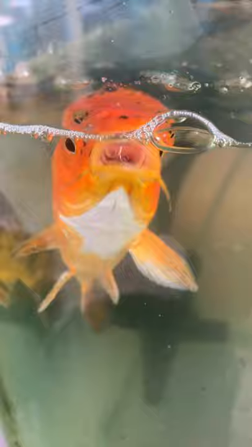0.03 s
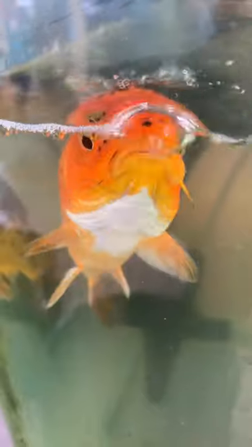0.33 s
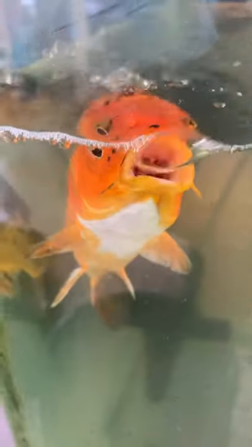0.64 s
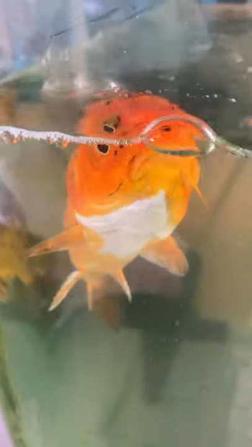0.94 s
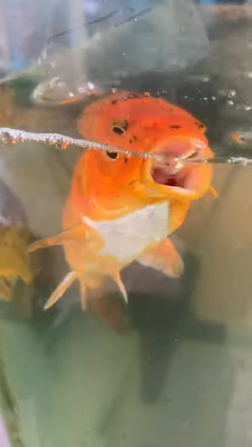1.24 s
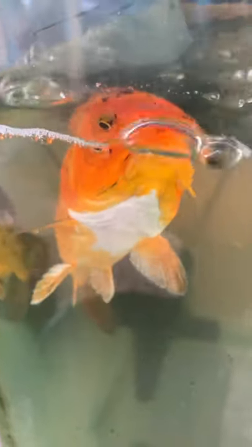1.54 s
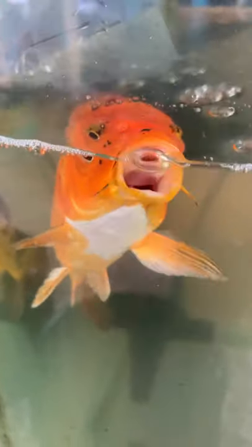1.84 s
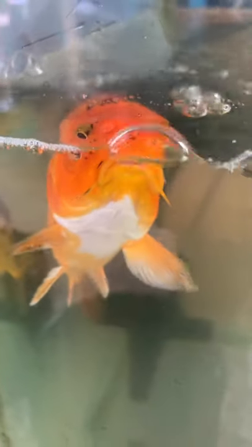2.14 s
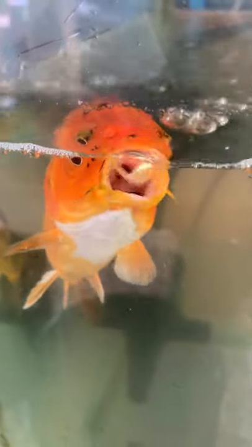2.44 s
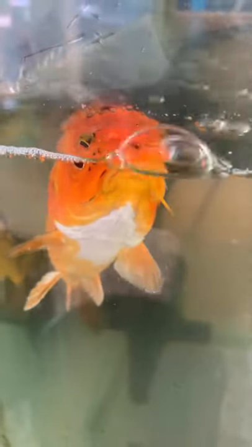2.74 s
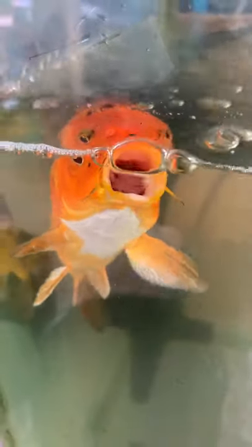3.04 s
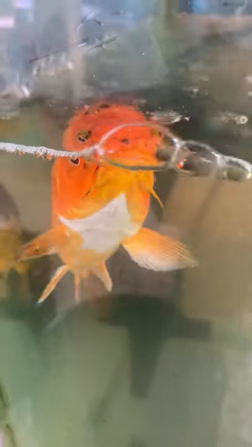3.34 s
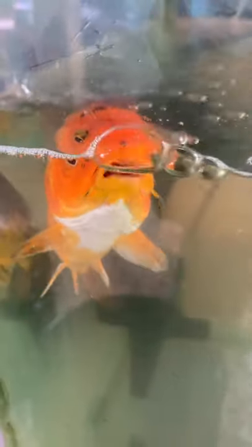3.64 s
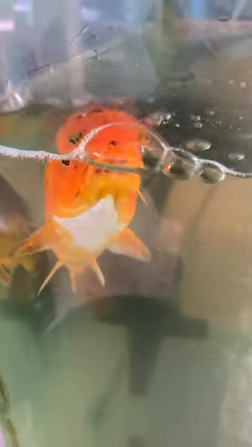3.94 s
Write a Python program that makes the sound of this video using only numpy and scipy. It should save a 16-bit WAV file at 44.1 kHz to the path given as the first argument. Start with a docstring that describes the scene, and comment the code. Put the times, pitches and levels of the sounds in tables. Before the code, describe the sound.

A goldfish gulps at the surface of a tank, very close, making short bubbles and sharp wet pops. A small cluster in the first half second thins to light ticks. From about 1.3 seconds the water gurgles and fizzes in surges, strongest near 1.8, 2.6 and 3.2 seconds. After 3.4 seconds it settles to a few small bubbles. A low uneven rumble and faint hiss lie underneath.

```python
"""At the surface of a fish tank, very close, a goldfish gulps.
Its lips trap air that rings as short bubbles, films burst with sharp ticks, and the churned
water gurgles and fizzes in surges. Under it lie a lumpy low rumble, a faint hum and hiss.
The tank adds a resonance and a short ring from its glass walls."""
import sys
import numpy as np
from scipy import signal
from scipy.fft import rfft, irfft
from scipy.io import wavfile

SR = 44100
rng = np.random.default_rng(int(sys.argv[2]) if len(sys.argv) > 2 else 0)


def materialize(psi):
    """Save the field psi as 16-bit PCM at rate SR to the path in sys.argv[1].

    A 1-D psi becomes a single channel; in a 2-D psi each row is a channel.
    """
    bounded = np.clip(np.atleast_2d(psi).T, -1, 1)
    quanta = np.round(bounded * 32767).astype(np.int16)
    wavfile.write(sys.argv[1], SR, quanta)


N = 176400
TIME = np.arange(N) / SR


def from_db(db):
    """Decibels to gain."""
    return 10 ** (np.asarray(db) / 20)


def unit_rms(x):
    """Scale to rms 1."""
    return x / np.sqrt(np.mean(x ** 2) + 1e-20)


def gain_curve(rows):
    """Gain over time from (s, dB) rows."""
    return from_db(np.interp(TIME, *np.transpose(rows)))


def decay(t, t60_s):
    """Fall by 60 dB in t60_s."""
    return from_db(-60 * t / t60_s)


def add(out, start_s, sound):
    """Mix a sound in at start_s."""
    i = int(np.clip(start_s * SR, 0, N - 1))
    out[i:i + len(sound)] += sound[:N - i]


def coloured(x, spectrum):
    """Filter by (Hz, dB) rows, rolling off outside them; rms 1."""
    hz = np.arange(N // 2 + 1) * SR / N
    row_hz, row_db = np.transpose(spectrum)
    gain = from_db(np.interp(np.log(hz + 1e-3), np.log(row_hz), row_db))
    skirts = 1 / (1 + (hz / (2 * row_hz[-1])) ** 4) / (1 + (row_hz[0] / (2 * hz + 1e-3)) ** 4)
    return unit_rms(irfft(rfft(x) * gain * skirts, N))


def noise(spectrum):
    """Coloured noise, rms 1."""
    return coloured(rng.standard_normal(N), spectrum)


def resonance(x, hz, width_hz):
    """Two-pole resonator, peak gain 1."""
    r = np.exp(-np.pi * width_hz / SR)
    feedback = [1, -2 * r * np.cos(2 * np.pi * hz / SR), r * r]
    return signal.lfilter(np.array([1, 0, -1]) * (1 - r * r) / 2, feedback, x + 1e-18)


def band(x, hz, width_hz, widen=1):
    """Two resonators in series, the second widen times as wide; rms 1."""
    return unit_rms(resonance(resonance(x, hz, width_hz), hz, widen * width_hz))


def clumps(spread_db=2.33, cutoff_hz=69):
    """Wandering gain: foam and churning come in quick uneven clumps."""
    wander = signal.sosfilt(signal.butter(2, cutoff_hz, fs=SR, output="sos"), rng.standard_normal(N))
    return from_db(spread_db * np.clip(unit_rms(wander), -2, 2))


def bubble(hz, t60_cycles, onset_cycles=0.95, rise_per_cycle=0.0019):
    """An air pocket swells in about a cycle, rings down and rises a little in pitch."""
    cycles = np.arange(int(t60_cycles / hz * SR * 1.2) + 2) * hz / SR
    envelope = (1 - np.exp(-(cycles / onset_cycles) ** 2)) * from_db(-60 * cycles / t60_cycles)
    return envelope * np.sin(2 * np.pi * cycles * (1 + rise_per_cycle * cycles / 2))


# Stereo noise spectrum. Each row: frequency in Hz, relative level in dB.
STEREO_NOISE_SPECTRUM = [(25, 13), (100, -4), (200, -2), (500, -3.5), (1500, -17), (4000, -29)]

def faint_stereo_noise():
    """Very faint low diffuse noise that gives slight stereo width."""
    return from_db(-68.5) * noise(STEREO_NOISE_SPECTRUM)


# Hiss spectrum. Each row: frequency in Hz, relative level in dB.
HISS_SPECTRUM = [(100, 9.5), (250, 8.5), (600, 5.5), (1500, -37), (4000, -32), (8500, -6.5),
                 (11000, -11), (16000, -6.5)]

def hum_and_hiss():
    """A faint wavering hum in steady noise, low murmur plus high hiss."""
    hum = from_db(-59) * band(rng.standard_normal(N), hz=391.5, width_hz=27)
    return hum + from_db(-55) * noise(HISS_SPECTRUM)


# Rumble envelope. Each row: time in seconds, level in dB.
RUMBLE_LEVEL = [(0.04, -34.5), (0.31, -41), (0.52, -26.5), (0.87, -31.5), (0.98, -23), (1.16, -28),
                (1.76, -36), (1.79, -23), (2.02, -23.5), (2.14, -33), (2.23, -32), (2.36, -22), (2.44, -24),
                (2.49, -30), (2.94, -34), (3.17, -25.5), (3.43, -37), (3.99, -33.5)]
# Rumble spectrum. Each row: frequency in Hz, relative level in dB.
RUMBLE_SPECTRUM = [(10, 4), (18, -3), (30, -11), (50, -13.5), (80, -23), (130, -29), (220, -38), (400, -45),
                   (900, -54)]

def rumble(bump_s=2.43, bump_hz=21.7, bump_width_s=0.014):
    """Lumpy low noise with one dull bump."""
    t = TIME - bump_s
    bump = from_db(-8.5) * np.exp(-(t / bump_width_s) ** 2) * np.cos(2 * np.pi * bump_hz * t)
    return from_db(4.5) * gain_curve(RUMBLE_LEVEL) * noise(RUMBLE_SPECTRUM) + bump


def tank_echoes(x, cutoff_hz, t60_s=0.076, delay_s=0.002):
    """Dense, dull reflections between the glass walls."""
    t = TIME[:SR // 4]
    echoes = rng.standard_normal(len(t)) * decay(t, t60_s) * (t > delay_s)
    lowpass = signal.butter(1, cutoff_hz, fs=SR, output="sos")
    return signal.fftconvolve(x, signal.sosfilt(lowpass, echoes / np.linalg.norm(echoes)))[:N]


# Vigour of the foam. Each row: time in seconds, level in dB.
FOAM_LEVEL = [(0.04, -46.5), (0.15, -43.5), (0.24, -42), (0.28, -50), (0.35, -44), (0.4, -49.5),
              (0.43, -39), (0.46, -49.5), (0.82, -53.5), (0.84, -48), (0.96, -50), (1.02, -51.5),
              (1.19, -54.5), (1.45, -34.5), (1.5, -42.5), (1.54, -31), (1.75, -38), (1.77, -23),
              (1.94, -44), (1.96, -36.5), (2.04, -47.5), (2.08, -39.5), (2.18, -39), (2.25, -33),
              (2.45, -32.5), (2.49, -27.5), (2.6, -27), (2.64, -35), (2.89, -40), (3.02, -29), (3.06, -35),
              (3.21, -27.5), (3.41, -48), (3.71, -38.0), (3.89, -39), (3.99, -52)]
# Foam spectrum. Each row: frequency in Hz, relative level in dB.
FOAM_SPECTRUM = [(300, 2), (600, -13.5), (1500, -11.5), (3000, -1), (5000, 1), (7000, -2), (8800, 0.5),
                 (10500, -7), (14000, -4), (16000, -16)]

def fizz(collapses_per_s=4000, spread_db=2.5, q=9):
    """Foam: a crowd of tiny collapses on a smooth spray of finer ones."""
    sizes = from_db(spread_db * np.minimum(rng.exponential(1, N), 4)) * rng.choice([-1, 1], N)
    clicks = sizes * (rng.random(N) < collapses_per_s / SR)
    bands_hz = np.geomspace(1800, 14500, 20)
    click_band = rng.integers(0, len(bands_hz), N)
    grains = sum(resonance(clicks * (click_band == k), hz, hz / q) for k, hz in enumerate(bands_hz))
    foam = from_db(-3.5) * coloured(grains, FOAM_SPECTRUM) + from_db(-2.5) * noise(FOAM_SPECTRUM)
    return gain_curve(FOAM_LEVEL) * clumps() * foam


def pings(per_s=110, spread_db=6.5, low_hz=2000, high_hz=9000):
    """Tiny bubbles ping on the surface, louder when the foam is lively."""
    out = np.zeros(N)
    for when, pitch, size in rng.random((int(per_s * N / SR), 3)):
        hz = low_hz * (high_hz / low_hz) ** pitch
        db = -40.5 + spread_db * min(-np.log(1 - size), 3)
        add(out, when * N / SR, from_db(db) * bubble(hz, t60_cycles=34))
    vigour = gain_curve(FOAM_LEVEL)
    return out * vigour / np.median(vigour)


# Vigour of the churning. Each row: time in seconds, level in dB.
GURGLE_LEVEL = [(0.04, -43.5), (0.13, -37.5), (0.31, -49), (0.35, -38.5), (0.38, -49), (0.48, -46),
                (0.61, -50), (0.8, -54.1), (0.86, -49), (1.22, -56.5), (1.24, -43), (1.38, -31.5),
                (1.6, -31.5), (1.74, -35.5), (1.83, -26.3), (1.93, -40), (1.98, -31.3), (2.03, -39),
                (2.23, -30.5), (2.45, -34.3), (2.6, -28), (2.64, -35.5), (2.85, -33), (2.95, -40),
                (3.03, -32.5), (3.13, -33), (3.22, -27.5), (3.32, -35.5), (3.36, -41), (3.42, -50),
                (3.48, -43.5), (3.63, -49), (3.65, -45), (3.99, -48)]
# Churned water spectrum. Each row: frequency in Hz, relative level in dB.
GURGLE_SPECTRUM = [(120, -24), (280, -10.5), (500, -0.5), (800, 3.5), (1100, 0), (1600, 2.5), (2400, -3.5),
                   (3500, -9.5), (6000, -26)]

def gurgle(bubbles_per_s=1000, spread_db=4, low_hz=330, high_hz=4500):
    """A random swarm of lesser bubbles over the wash of churned water."""
    swarm = np.zeros(N)
    wash = from_db(-5) * noise(GURGLE_SPECTRUM) * clumps()
    for when, pitch, size, polarity in rng.random((int(bubbles_per_s * N / SR), 4)):
        hz = low_hz * (high_hz / low_hz) ** np.sqrt(pitch)
        db = spread_db * min(-np.log(1 - size), 3)
        gain = np.sign(polarity - 0.5) * from_db(db) * hz ** 1.1
        add(swarm, when * N / SR, gain * bubble(hz, t60_cycles=20))
    return gain_curve(GURGLE_LEVEL) * (from_db(-4) * coloured(swarm, GURGLE_SPECTRUM) + wash)


# Rising bubbles. Each row: start in seconds, length in seconds, first and last pitch in Hz, level in dB.
RISING_BUBBLES = [(0.038, 0.019, 905, 1450, -37), (1.233, 0.036, 1015, 1470, -37.5),
                  (3.642, 0.053, 850, 1060, -30.5)]

def rising_bubbles(fade_db=14):
    """Long-ringing bubbles climb ever faster in pitch as they near the surface."""
    out = np.zeros(N)
    for start_s, length_s, first_hz, last_hz, db in RISING_BUBBLES:
        progress = np.linspace(0, 1, int(length_s * SR))
        phase = 2 * np.pi * np.cumsum(first_hz + (last_hz - first_hz) * progress ** 2) / SR
        envelope = from_db(db - fade_db * progress) * signal.windows.tukey(len(progress), 0.12)
        add(out, start_s, envelope * np.sin(phase))
    return out


# Bursting films. Each row: start in seconds, relative level in dB, band centre in Hz.
FILM_POPS = [(0.0648, -22.5, 7500), (0.116, -10.5, 4500), (.120, -13, 3600), (.158, -14.5, 6940),
             (0.23, -15, 5400), (0.246, -23.5, 2470), (0.334, -29, 7000), (.350, -14.5, 5040),
             (0.3514, -14, 5370), (.389, -19, 7900), (.412, -18.5, 3840), (.432, -19, 7600),
             (.436, -19, 2630), (.5035, -26, 7560), (.650, -29, 7040), (.681, -30, 3900), (.836, -28, 7900),
             (.846, -24.5, 7850), (.881, -20.5, 5400), (0.896, -20.5, 8600), (.955, -22.5, 11900),
             (0.958, -16.5, 5700), (1.036, -29.5, 8400), (1.093, -27.5, 4800), (1.1295, -27, 9000),
             (1.159, -26, 5130), (1.174, -26.5, 8500), (1.339, -19.5, 4660), (1.443, -20, 4000),
             (1.520, -23, 4500), (1.551, -18, 5000), (1.587, -13.5, 5100), (1.618, -13, 5740),
             (1.706, -12, 9150), (1.766, -11, 7000), (1.778, -10, 4900), (1.879, -14.5, 6000),
             (1.892, -17, 4500), (1.954, -19, 8400), (2.115, -32, 7000), (2.289, -14, 4760),
             (2.6, -14, 4000), (2.677, -16.5, 7500), (2.745, -21.5, 7950), (2.8715, -8, 7900),
             (2.8705, -6.5, 9200), (3.016, -14, 4570), (3.041, -14, 4000), (3.103, -9, 7700),
             (3.176, -6, 6640), (3.208, -5, 7550), (3.234, -9, 8340), (3.257, -3, 4730), (3.325, -15, 7900),
             (3.348, -25, 5870), (3.386, -21, 3980), (3.634, -24, 7000), (3.810, -15, 6500)]

def film_pops(burst_t60_s=0.016, snap_t60_s=0.00066):
    """A film tears: a snap and a brief burst, coloured by the cavity under it."""
    out, t = np.zeros(N), TIME[:SR // 40]
    envelope = decay(t, burst_t60_s) + 4.1 * decay(t, snap_t60_s)
    for start_s, db, hz in FILM_POPS:
        tear = rng.standard_normal(len(t)) * envelope
        cavity = band(tear, hz, width_hz=0.61 * hz)
        add(out, start_s, 0.0704 * from_db(db) * (cavity + 0.52 * unit_rms(tear)))
    return out


# Mouth bubbles. Each row: start in seconds, pitch in Hz, relative level in dB, 60 dB decay in cycles.
MOUTH_BUBBLES = [(.115, 1320, -16, 17), (0.141, 970, -17, 10.5), (.165, 740, -14, 11.8),
                 (0.164, 2700, -19, 20), (0.349, 1250, -26, 16), (.349, 2830, -13.5, 15),
                 (0.444, 1410, -26.5, 32), (0.468, 2180, -32, 49), (0.4807, 1590, -25.5, 46),
                 (.496, 450, -30, 18), (.532, 2620, -33.5, 45), (.812, 2080, -35.5, 67),
                 (.8495, 1590, -26, 62), (.891, 2070, -30, 24), (0.919, 1460, -32, 35),
                 (0.933, 975, -36, 28), (0.949, 2990, -36, 70), (.960, 2360, -33, 32),
                 (.970, 1514, -33.5, 46), (0.995, 1800, -31.5, 59), (1.13, 2200, -30, 49),
                 (1.315, 676, -21, 19), (1.335, 1590, -16, 12), (1.3719, 1550, -16.5, 24),
                 (1.380, 1460, -23, 27), (1.394, 1290, -18, 27), (1.405, 3100, -21.5, 70),
                 (1.409, 1010, -16, 23), (1.444, 1690, -20.5, 25), (1.45, 3470, -20.5, 40),
                 (1.452, 1110, -17, 25), (1.475, 2300, -27, 39), (1.483, 1190, -24, 26),
                 (1.521, 1680, -17.5, 28), (1.533, 1480, -16, 22), (1.587, 1060, -19, 22),
                 (1.602, 1440, -17.5, 49), (1.608, 717, -22, 25), (1.668, 1810, -16.5, 19),
                 (1.711, 2560, -22, 32), (1.805, 740, -9, 8.5), (1.829, 2780, -21, 33),
                 (1.881, 3630, -16, 20), (1.884, 2300, -21, 34), (1.976, 2860, -24.5, 37),
                 (1.986, 483, -20.5, 18), (1.996, 1800, -28, 31), (2.057, 273, -33, 15),
                 (2.073, 165, -25.5, 10.5), (2.1122, 2480, -20, 40), (2.115, 3530, -23, 35),
                 (2.141, 900, -24.5, 18), (2.190, 716, -20, 12), (2.202, 580, -25, 20),
                 (2.256, 560, -26, 14), (2.288, 1390, -14.5, 18), (2.3, 1510, -12.5, 11),
                 (2.381, 1600, -13, 18), (2.417, 1940, -21, 31), (2.507, 483, -27, 22),
                 (2.515, 1870, -18, 32), (2.555, 786, -18.5, 20), (2.590, 1560, -17, 18),
                 (2.600, 1500, -10, 18), (2.601, 2330, -14.5, 17), (2.839, 1290, -23, 24),
                 (2.87, 1066, -24, 31), (2.909, 2410, -20.5, 18), (2.971, 2250, -24.5, 59),
                 (3.016, 1490, -15.5, 22), (3.018, 2390, -24, 40), (3.025, 1380, -19, 24),
                 (3.036, 2300, -16.5, 28), (3.040, 1610, -18, 26), (3.041, 600, -14.5, 6.3),
                 (3.105, 2140, -20, 28), (3.176, 3400, -8.5, 17), (3.207, 2820, -8.5, 19),
                 (3.211, 1700, -9, 28), (3.219, 740, -13, 9.1), (3.225, 337, -9, 5),
                 (3.257, 2100, -17.5, 31), (3.276, 510, -19.5, 11), (3.293, 2300, -28, 30),
                 (3.343, 498, -16, 11), (3.351, 710, -15.5, 14.4), (3.358, 1240, -15.5, 14),
                 (3.356, 1730, -18, 20), (3.359, 377, -11.5, 7.4), (3.364, 494, -24, 14),
                 (3.392, 1760, -33.5, 61), (3.483, 2050, -29.5, 34), (3.540, 510, -38, 44),
                 (3.776, 2070, -31.5, 53), (3.843, 2470, -35, 42)]

def gulps(ring_db=5, spatter_db=-8.5, spatter_t60_s=0.034):
    """Air pinched off at the mouth rings; water torn up around it spatters near the same pitch."""
    out, t = np.zeros(N), TIME[:SR // 12]
    for start_s, hz, db, t60_cycles in MOUTH_BUBBLES:
        add(out, start_s, from_db(db + ring_db) * bubble(hz, t60_cycles))
        spatter = band(rng.standard_normal(len(t)) ** 3, hz, width_hz=0.6 * hz, widen=2)
        add(out, start_s, from_db(db + spatter_db) * spatter * decay(t, spatter_t60_s))
    return out


def scene():
    """All sources centred, with a trace of width."""
    background = rumble() + hum_and_hiss()
    stereo_noise = faint_stereo_noise()
    water = gulps() + rising_bubbles() + film_pops() + fizz() + gurgle() + pings()
    tank_body = from_db(-5.5) * resonance(water, hz=510, width_hz=35)
    mid = background + water + tank_body + from_db(-9.5) * tank_echoes(water, cutoff_hz=4000)
    side = stereo_noise + from_db(-43) * tank_echoes(water, cutoff_hz=2320)
    fade_in = np.clip((TIME - 0.03) / 0.0042, 0, 1)
    return np.array([mid + side, mid - side]) * fade_in


def record(dry, notch_hz=5875, cutoff_hz=15700):
    """A narrow treble notch and a steep low-pass."""
    notched = signal.lfilter(*signal.iirnotch(notch_hz, Q=130, fs=SR), dry)
    return signal.sosfilt(signal.ellip(10, 0.1, 80, cutoff_hz, fs=SR, output="sos"), notched)


dry = scene()
out = record(dry)
materialize(out)
```